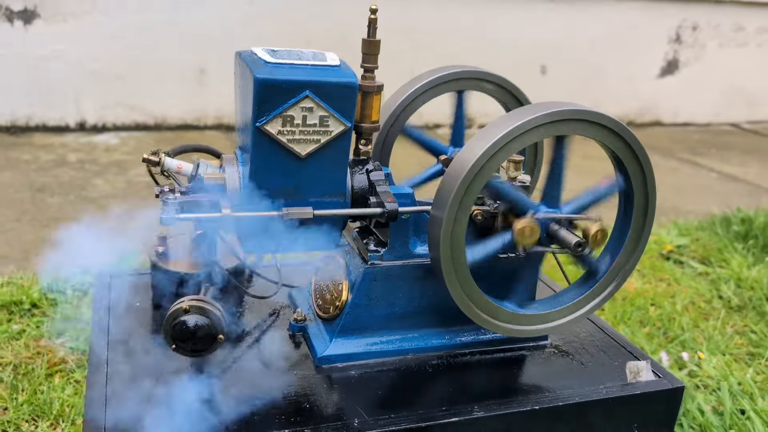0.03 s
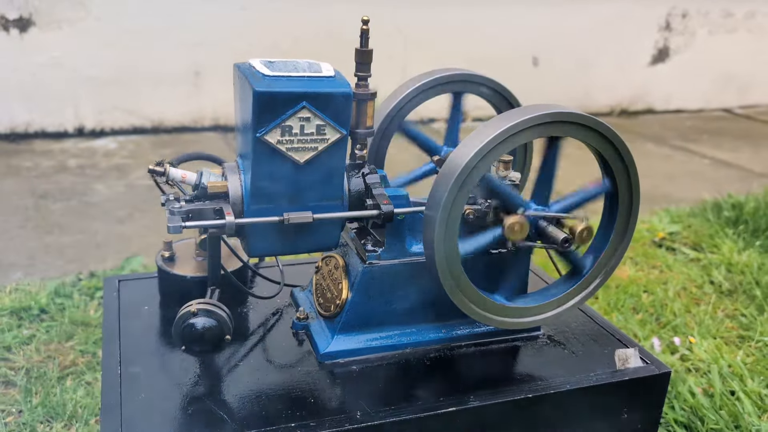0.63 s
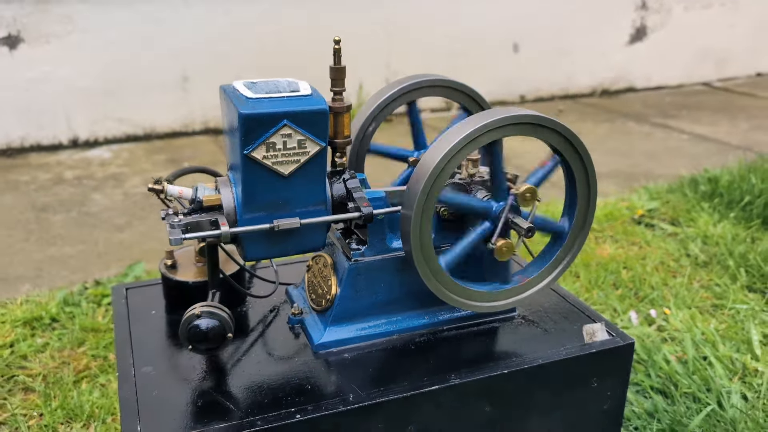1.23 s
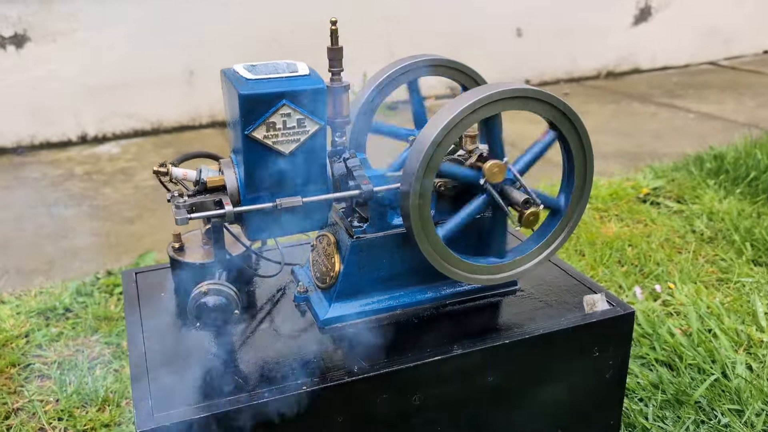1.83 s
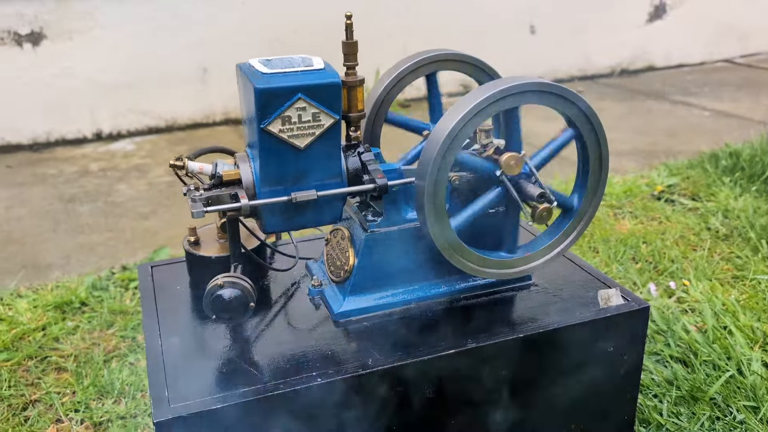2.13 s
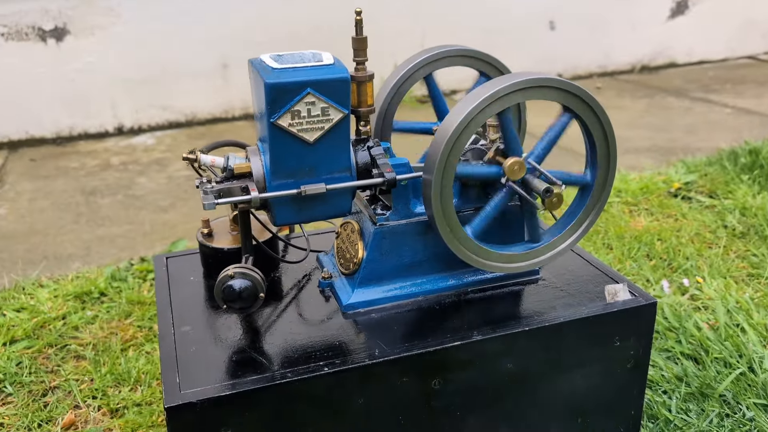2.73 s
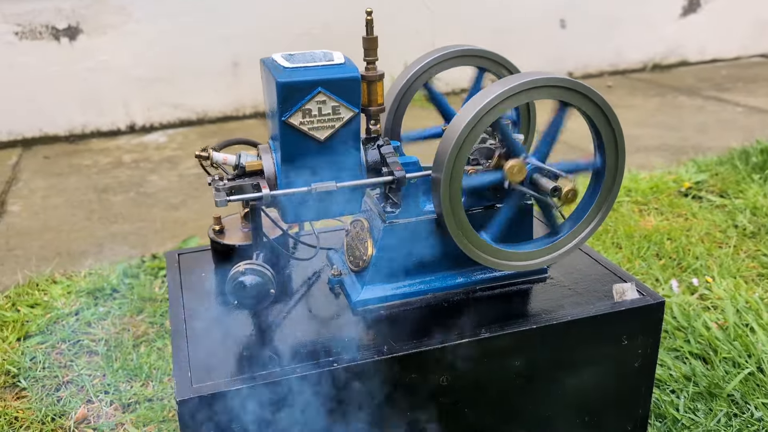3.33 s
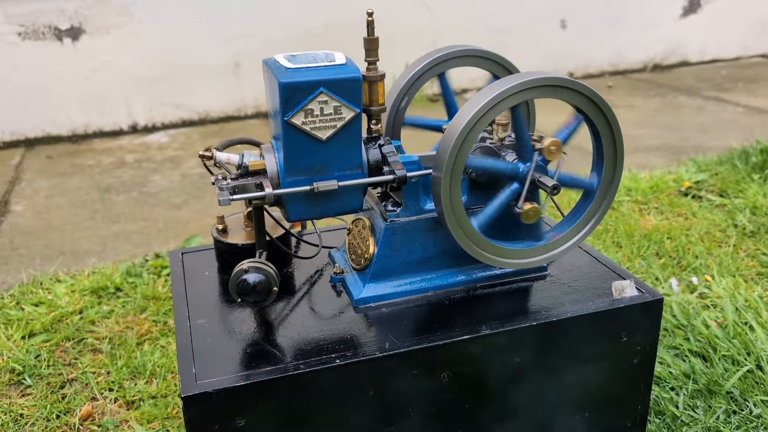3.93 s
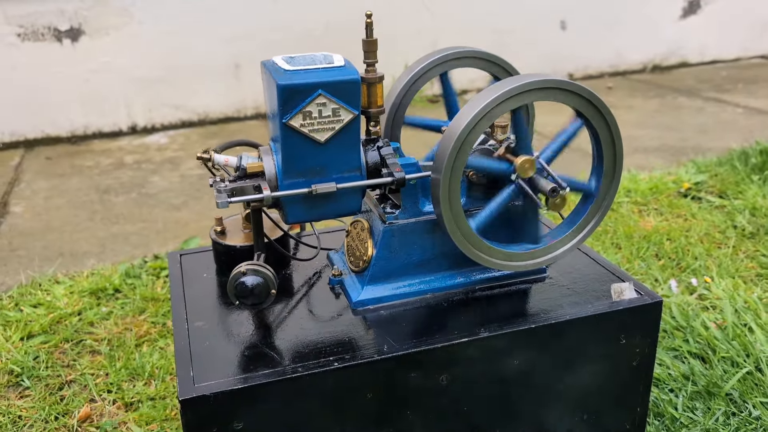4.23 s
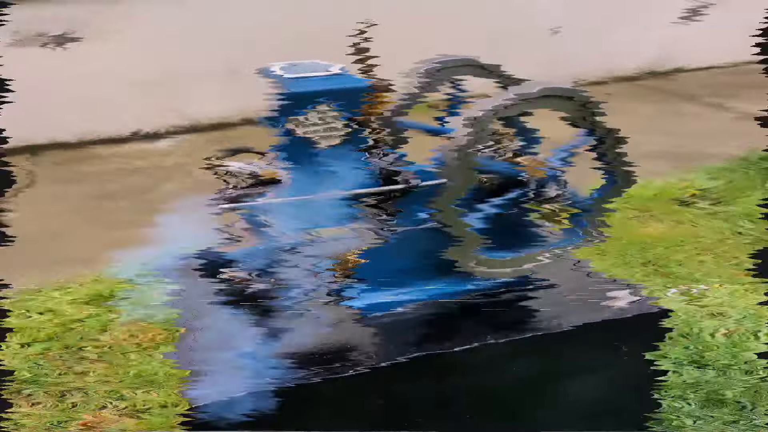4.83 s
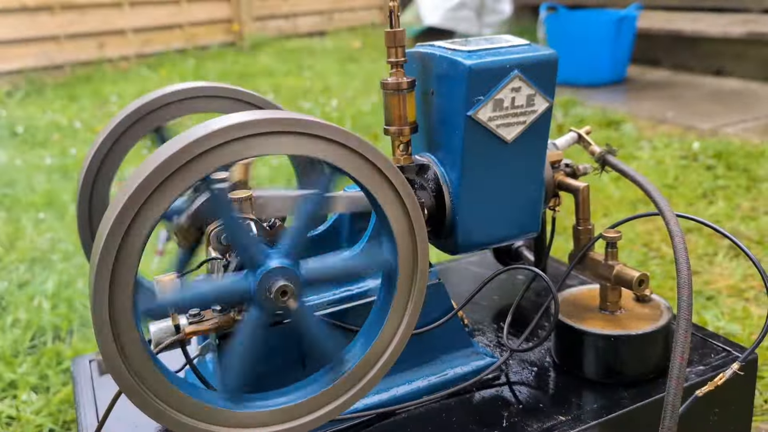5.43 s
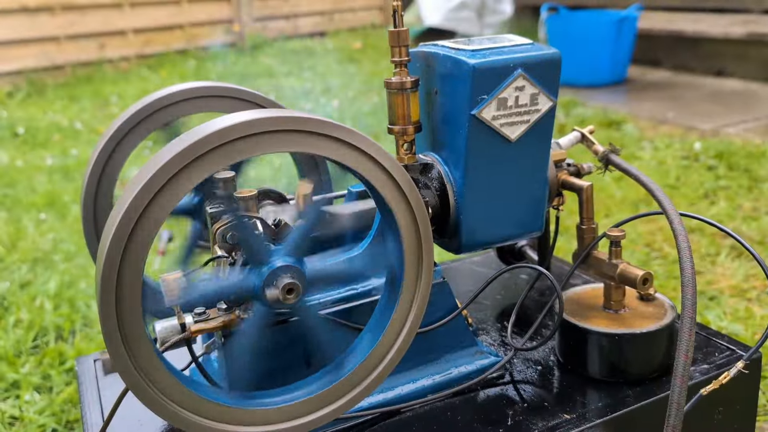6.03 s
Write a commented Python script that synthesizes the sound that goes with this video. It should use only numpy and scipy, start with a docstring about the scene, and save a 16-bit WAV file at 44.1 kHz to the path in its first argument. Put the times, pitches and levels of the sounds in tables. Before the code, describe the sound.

A small stationary gas engine runs on a hollow box in a yard, heard close. It fires with a low thump and a sharp exhaust crack about every second and a half. Between firings the flywheels coast and slow, with rapid knocking, metallic ticking and puffs of air, then a short intake gulp leads to the next bang. Near the end the sound fades out, returns from the engine's other side and fires again.

```python
"""A thump and a sharp crack: a small hit-and-miss gas engine fires on a hollow box in a yard.
Each firing thumps the box and cracks out of the exhaust. Then the flywheels coast and slow down,
while the rod knocks, the linkage ticks and the piston puffs air through the held-open valve.
The engine gulps fresh fuel and fires again. Near the end the sound fades out and comes back,
heard from the other side of the engine."""
import sys
import numpy as np
from scipy import signal
from scipy.fft import rfft, irfft, next_fast_len
from scipy.io import wavfile
from scipy.ndimage import map_coordinates

SR = 44100
rng = np.random.default_rng(int(sys.argv[2]) if len(sys.argv) > 2 else 0)


def dump_mix(stems):
    """Bounce the given channels to the path in sys.argv[1] as a 16-bit WAV at rate SR."""
    frames = np.atleast_2d(stems).T  # one column per channel
    limited = np.clip(frames, -1, 1)  # hard clip at full scale
    pcm = np.round(limited * 32767).astype(np.int16)
    wavfile.write(sys.argv[1], SR, pcm)


N = 273420
TIME = np.arange(N) / SR


def amp(db):
    """Turn decibels into a number to multiply by."""
    return 10 ** (np.asarray(db) / 20)


def unit(x):
    """Scale a signal to an average (rms) size of 1."""
    return x / np.sqrt(np.mean(x ** 2) + 1e-20)


def along(points, hz):
    """Read between the rows of a (frequency, value) table, with octaves evenly spaced."""
    f, v = np.transpose(points)
    return np.interp(np.log(hz + 1), np.log(f), v)


def filtered(x, response):
    """Change each frequency in x by the gain and phase that response gives it."""
    m = next_fast_len(N + SR // 2)
    return irfft(rfft(x, m) * response(np.fft.rfftfreq(m, 1 / SR)), m)[..., :N]


# Sound bouncing off the box and ironwork, compared with direct sound: f/Hz, level/dB
SCATTERED = [(50, -9), (150, -44), (350, -10), (1200, -8), (2500, -3), (5000, 0.5), (15000, 4.5)]
def noise(spectrum):
    """Stereo noise with a given tone: one part shared by both sides, one scattered to each."""
    m = next_fast_len(N)
    hz = np.fft.rfftfreq(m, 1 / SR)
    colour = amp(along(spectrum, hz)) * np.minimum(hz / spectrum[0][0], 1) ** 2
    scattered = amp(along(SCATTERED, hz))
    white = rng.standard_normal((3, 2 * len(hz))).view(complex)
    stereo = (white[0] + scattered * white[1:]) / np.hypot(1, scattered)
    return unit(irfft(stereo * colour, m)[:, :N])


def wobble(rate):
    """A smooth curve through `rate` random points a second."""
    return map_coordinates(rng.standard_normal(int(N * rate / SR) + 4), [TIME * rate / SR])


def swell(t, peak, sharpness):
    """Rise from 0 to 1 at t = peak, then die away."""
    u = np.maximum(t, 0) / peak
    return (u * np.exp(1 - u)) ** sharpness


def add(track, s, sound):
    """Mix a sound into the track, starting at s seconds."""
    part = track[max(round(s * SR), 0):][:len(sound)]
    part += sound[:len(part)]


def repeated(times, levels_db, shape):
    """Place a copy of one shape at each time, each at its own level."""
    track = np.zeros(N)
    for s, db in zip(times, levels_db):
        add(track, s, amp(db) * shape)
    return track


# Tones of burning fuel, exhaust crack, valve hiss and air leaving the pipe: f/Hz, level/dB
BURN_TONE = [(200, 0), (480, -17.5), (720, 4), (930, 5.5), (1200, -4.5), (1700, -6), (3000, -76),
             (7000, -20), (15000, -53)]
CRACK_TONE = [(350, -17), (500, -13.5), (780, -19), (1050, -18.5), (1400, -11.5), (2000, 0.5), (3000, -1.5),
              (4500, -3.5), (7000, -9.5), (9200, -10), (10600, -8), (11700, 1), (13000, -8), (15300, -30)]
VALVE_TONE = [(3000, -1), (5000, -11), (7400, 2), (9500, -5.5), (10500, -6.5), (11100, 0), (11800, 5.5),
              (12400, 5), (13300, 2.5), (15500, 1.5)]
OUT_PUFF_TONE = [(500, -16.5), (1200, 0.5), (1500, -3), (1750, -4), (2300, 0.5), (2650, -1), (2980, 0),
                 (3400, -1.5), (3800, -5), (5200, -11.5), (8500, -33.5)]
# One row per firing: fuel lights t/s, exhaust opens t/s, thump level/dB, crack level/dB,
# crack length t/s, pipe ring level/dB, bark level/dB, burn level/dB
BANGS = [(0.024, .068, -17, -14.5, 0.007, -24.5, -34.5, -27),
         (1.7, 1.746, -20, -13.5, 0.0064, -34.5, -27, -27),
         (3.122, 3.165, -19.5, -14.5, 0.009, -30, -18.5, -28),
         (4.79, 4.835, -19, -13, 0.006, -32, -23, -26.5),
         (5.596, 5.645, -18, -19, 0.013, -16.5, -38, -32.5)]
def firings(leak_lead_s=0.029, leak_db=-25):
    """Burning fuel shoves the frame; the valve cracks open, gas shrieks out and the box heaves."""
    thump, burn, crack, jet, rush, pipe = np.zeros((6, N))
    t = np.arange(SR // 4) / SR
    for lit, opens, thump_db, crack_db, length, ring_db, bark_db, burn_db in BANGS:
        add(burn, lit, amp(burn_db) * (swell(t, 0.003, 0.42) + 0.36 * swell(t, 0.038, 4)))
        add(thump, lit, amp(thump_db) * swell(t, 0.02, 5.9) * np.sin(2 * np.pi * 148 * t))
        add(thump, lit, amp(thump_db - 13.5) * swell(t, 0.025, 3.3) * np.sin(2 * np.pi * 80 * t))
        # A little gas leaks past the valve as it starts to lift.
        add(rush, opens - leak_lead_s, amp(crack_db + leak_db) * swell(t, 0.021, 0.72))
        add(burn, opens, amp(bark_db) * swell(t, .0015, 0.8))  # the first gas out barks
        blast = amp(crack_db) / (1 + (t / length) ** 10)
        add(crack, opens, blast * (1 - np.exp(-t / 0.0011)))
        add(jet, opens, blast * np.minimum(t / .004, 1) ** 2)
        add(pipe, opens, amp(ring_db) * swell(t, 0.0018, 0.75))
        add(rush, opens, amp(crack_db - 13) * swell(t, .02, 1.1))
        add(thump, opens, amp(thump_db) * swell(t, 0.032, 12) * np.sin(2 * np.pi * 62 * t))
        add(thump, opens, amp(thump_db - 5.0) * swell(t, 0.026, 2.7) * np.sin(2 * np.pi * 143 * t))
    sputter = amp(2 * wobble(900))
    exhaust = (crack + rush * sputter) * noise(CRACK_TONE)
    shriek = amp(-1.5) * jet * noise(VALVE_TONE)
    ring = iron_ring(pipe * noise(OUT_PUFF_TONE))
    return thump + burn * noise(BURN_TONE) + exhaust + shriek + ring


# The notes at which the exhaust pipe and valve ring: f/Hz, width f/Hz, level/dB
IRON_NOTES = [(2090, 260, -9), (2430, 223, -1), (2900, 114, 0), (10800, 150, 8.5), (12680, 330, -1.5),
              (14550, 400, -3)]
def iron_ring(x):
    """The pipe and valve boost their own notes in any sound that passes through."""
    return filtered(x, lambda hz: 1 + sum(
        amp(db) * 1j * hz * width / (note ** 2 - hz ** 2 + 1j * hz * width)
        for note, width, db in IRON_NOTES))


CRUISE = 16  # a middling speed, in piston strokes a second
# Runs of coasting: start t/s, starting speed/(strokes/s), speed lost per stroke/(strokes/s),
# speed lost per stroke count squared/(strokes/s)
RUNS = [(0.0079, 23.160, .3220, .004153), (1.6808, 21.937, .2621, .007123), (3.108, 23.416, .3519, .003137),
        (4.7748, 21.8, .35, 0), (4.9931, 15.506, .4382, 0), (5.5867, 23.306, .3952, 0)]
# How much louder each run is: knock and tick level/dB, puff level/dB, hiss level/dB
RUN_LEVELS = [(0.7, 5, 3), (0.85, 0.1, -0.4), (0.5, 0.6, -0.1), (2.5, -7.5, -4), (-4, -2.5, -7.5),
              (-4, -2, -5)]
# Four coasting strokes (in, out, in, out) at CRUISE: level/dB of knock, tick, boom, puff, hiss
STROKE_LEVELS = [(-35, -34.5, -62, -42.5, -42.5), (-33.5, -36.5, -47, -40.5, -40.5),
                 (-35, -35, -53.5, -42.5, -41.5), (-33, -49.5, -45, -40.5, -40.5)]
# What a doubling of speed adds: level/dB for the same five sounds
SPEED_BOOST = [0, 8.5, 25, 15.5, 17]
# What a firing's strokes (suck, squeeze, burn, exhaust) add: level/dB for the same five sounds
FIRING_BOOST = [(-1, 1, 10.5, -2, 6.5), (-4.5, 4.5, -5.5, -20.5, -13), (-7.5, -51.5, 5, -1.5, 0.5),
                (2, -2, 2, -4.5, 6.5)]
def strokes(power_stretch=1.419, late_share=.048, seated_speed=18.4, seated_db=-9):
    """The flywheels slow stroke by stroke. Gives start times, speeds and the five sounds' levels."""
    count, runs = np.arange(32), []
    odd = count % 2
    ends = [run[0] for run in RUNS[1:]] + [N / SR + .1]
    lit = np.array(BANGS)[:, 0]
    for (start, top, loss, drag), (clatter_db, puff_db, hiss_db), end in zip(RUNS, RUN_LEVELS, ends):
        speed = np.maximum(top - loss * count - drag * count ** 2, CRUISE / 2)
        if np.abs(lit - start).min() < 1 / CRUISE:
            speed[0] /= power_stretch  # the flywheels are still gathering speed
        # At the outer end of its travel the rod's slack closes a little late.
        times = start + np.cumsum(1 / speed) - (1 - late_share * odd) / speed
        levels = np.array(STROKE_LEVELS)[count % len(STROKE_LEVELS)]
        levels += np.outer(np.log2(speed / CRUISE), SPEED_BOOST)
        levels += [clatter_db, clatter_db, 0, puff_db, hiss_db]
        # At high speed the rod stays seated at that end and knocks less.
        levels[:, 0] += seated_db * odd / (1 + np.exp((seated_speed - speed) / 0.12))
        runs.append(np.column_stack([times, speed, levels])[times < end - .5 / speed])
    rows = np.vstack(runs)
    for fired in lit:
        power_stroke = np.abs(rows[:, 0] - fired).argmin()
        for stroke, change_db in enumerate(FIRING_BOOST, power_stroke - 2):
            if stroke >= 0:
                rows[stroke, 2:] += change_db
    return rows.T


def crank():
    """For every moment: which stroke it is, how much of it is done, and strokes a second."""
    times, speed = strokes()[:2]
    progress = np.interp(TIME, times, np.arange(len(times)))
    stroke = progress.astype(int)
    return stroke, progress % 1, speed[stroke]


# Tones of the rattling gears and the rumbling base: f/Hz, level/dB
GEAR_TONE = [(200, 2.5), (280, 2), (350, -2), (480, 6), (800, -3.5), (1300, -1.5), (2000, -10), (3200, -20),
             (5500, -20), (9000, -20), (11700, -39), (15000, -59)]
RUMBLE_TONE = [(25, -37), (40, -10.5), (57, 7), (76, 4), (105, -3), (160, 0), (240, -7.5), (340, -16),
               (600, -48)]
def gears_and_base():
    """The gears rattle and the base rumbles, both louder when the engine turns faster."""
    pace = crank()[2] / CRUISE
    rattle = amp(3 * wobble(130))
    gears = amp(-51.5) * rattle * pace ** 2.74 * noise(GEAR_TONE)
    return gears + amp(-45.0) * pace ** 0.51 * noise(RUMBLE_TONE)


# Tone of the rod's knock: f/Hz, level/dB
KNOCK_TONE = [(130, -0.5), (260, 1), (480, 0.5), (620, -2.5), (850, -0.5), (1300, 2), (1700, -8),
              (2600, -13), (5000, -36)]
def rod_knocks(travel_s=.008, front_hz=1900, chirp_delay_s=0.00146, spread_db=1.2):
    """The rod's slack closes at each turn: a dry clack, then bending waves make a falling chirp."""
    times, _, knock_db = strokes()[:3]
    t = np.arange(SR // 20) / SR
    rattle_shape = swell(t, 0.00092, 0.94) + 0.46 * swell(t, 0.007, 0.95)
    rattle = repeated(times, knock_db, rattle_shape) * noise(KNOCK_TONE)
    blows = repeated(times, knock_db + rng.normal(21.0, spread_db, len(times)), np.ones(1))
    bass_cut = lambda hz: np.minimum(hz / KNOCK_TONE[1][0], 1) ** 2
    thuds = filtered(blows, lambda hz: unit(amp(along(KNOCK_TONE, hz)) * bass_cut(hz)))
    clack_db = knock_db + rng.normal(-2, spread_db, len(times))
    clacks = repeated(times, clack_db, swell(t, 0.0021, 0.45)) * noise(KNOCK_TONE[2:])
    # High notes travel faster in bending waves, so they arrive first.
    lag = lambda hz: travel_s * (2 * np.sqrt(1000 / (hz + 1)) - np.sqrt(1000 / front_hz))
    chirps = filtered(thuds + rattle, lambda hz: np.exp(-2j * np.pi * hz * (lag(hz) + chirp_delay_s)))
    return clacks + chirps


# Tone of the linkage's tick: f/Hz, level/dB
TICK_TONE = [(900, 4), (2000, -0.5), (3800, 7.5), (5200, 2.5), (8000, 1), (12000, 0.5), (15500, -2)]
def linkage_ticks():
    """The levers tick at each turn, midway through every other stroke, and tripping spark and valve."""
    times, _, _, tick_db = strokes()[:4]
    lit, opens = np.array(BANGS)[:, :2].T
    t = np.arange(SR // 40) / SR
    tick = swell(t, 0.00055, 1.0) + 0.23 * swell(t, 0.0057, 1)
    midway = (times[:-1] + .46 * np.diff(times))[::2]
    trips = np.concatenate([lit - .0135, opens - .0185])
    main = repeated(times, tick_db + rng.normal(4.5, 1.0, len(times)), tick)
    light = repeated(midway, tick_db[::2][:len(midway)] + rng.normal(1.5, 2.4, len(midway)), tick)
    snaps = repeated(trips, rng.normal(-35, 1, len(trips)), tick)
    return (main + light + snaps) * noise(TICK_TONE)


# The notes of the air in the box and of its lid: f/Hz, level/dB
BOX_NOTES = [(152, 6.5), (238, -7.5)]
def box_boom():
    """Every stroke rocks the hollow box, which booms at a slightly different pitch each time."""
    track, t = np.zeros(N), np.arange(SR // 6) / SR
    times, _, _, _, boom_db, _, _ = strokes()
    for hz, note_db in BOX_NOTES:
        for s, db, (detune, phase) in zip(times, boom_db, rng.standard_normal((len(times), 2))):
            tone = np.sin(2 * np.pi * (hz * (1 + 0.047 * detune) * t + phase))
            add(track, s, amp(db + note_db) * swell(t, 0.01, 0.41) * tone)
    return track


# Tone of air sucked back into the pipe: f/Hz, level/dB
IN_PUFF_TONE = [(500, -2), (1250, 15.5), (1700, 6.5), (2150, 14), (2900, 11), (3700, -2.5), (5200, 8),
                (8500, -50)]
def piston_puffs():
    """Air goes out and in through the open exhaust, fastest near mid-stroke, and rings the iron."""
    stroke, done, _ = crank()
    puff_db, hiss_db = strokes()[-2:, stroke]
    flow = lambda skew: np.abs(np.sin(np.pi * done ** skew))
    pipe = np.where(stroke % 2, amp(1.63) * noise(OUT_PUFF_TONE), amp(-1.67) * noise(IN_PUFF_TONE))
    puff = amp(puff_db) * flow(1.45) ** 1.78 * pipe
    hiss = amp(hiss_db - 1.6) * flow(1.21) ** 1.7 * noise(VALVE_TONE)
    flutter = amp(2.26 * wobble(250))
    return iron_ring((puff + hiss) * flutter)


# Tone of the thin hiss: f/Hz, level/dB
SIZZLE_TONE = [(4000, -14), (6000, -10.5), (12000, -6), (15500, -5)]
def sizzle(loudest_s=1.27, width_s=0.58):
    """A thin hiss swells and fades while the engine first coasts."""
    return amp(-47.5) * np.exp(-((TIME - loudest_s) / width_s) ** 2) * noise(SIZZLE_TONE)


# Gulps of fuel and air: strongest flow t/s, half length t/s, level/dB
GULPS = [(1.543, 0.025, -34.5), (2.986, 0.023, -33), (4.636, 0.023, -34), (5.445, 0.019, -33)]
# Tones of the rush through the fuel mixer and the gulp in its throat: f/Hz, level/dB
MIXER_TONE = [(300, -16.5), (550, 6.5), (900, -36), (1300, -2.5), (1800, -2), (3000, -27), (4800, -4.5),
              (6500, -5.5), (9000, -8), (11700, -2), (13000, -17), (15300, -8.5)]
THROAT_TONE = [(260, 5.5), (400, -3), (560, 3), (750, -3), (1200, -8.5), (1800, -41), (3000, -57)]
def fuel_gulps():
    """With the exhaust shut, the piston sucks fuel and air past the fluttering inlet valve."""
    flow = sum(amp(db) / (1 + ((TIME - s) / half) ** 6) for s, half, db in GULPS)
    flutter = amp(3.5 * wobble(220) - 2.5)
    return flow * flutter * (amp(-1.5) * noise(MIXER_TONE) + amp(-2.0) * noise(THROAT_TONE))


# How long the yard's echo takes to fall by 60 dB: f/Hz, t/s
ECHO_TIMES = [(100, 0.11), (500, 0.72), (2500, 0.17), (8000, 0.096), (15000, 0.054)]
def yard_echo(x, gap_s=.007):
    """Wall and paving send back a soft wash of sound, different on each side and weak in the bass."""
    hz, t, spectrum = signal.stft(rng.standard_normal((2, SR // 3)), SR, nperseg=256)
    decay = amp(-60 * t / along(ECHO_TIMES, hz)[:, None])
    tail = signal.istft(spectrum * decay, SR, nperseg=256)[1]
    delayed = np.pad(x, (int(gap_s * SR), 0))
    echo = signal.fftconvolve(delayed[None], tail / np.linalg.norm(tail[0]), axes=1)[:, :N]
    return filtered(echo, lambda hz: amp(along(SCATTERED, hz)))


def heard_from(x, left_lead_s, balance):
    """The direct sound reaches one ear sooner, and each ear with its own tone."""
    side = np.array([[.5], [-.5]])
    lead = lambda hz: np.exp(2j * np.pi * hz * left_lead_s * side)
    return filtered(x, lambda hz: amp(side * along(balance, hz)) * lead(hz))


SWITCH_S = 4.957  # when the listener changes sides
# How much louder left is than right, in front of the engine and behind it: f/Hz, level/dB
FRONT_LEFT_BOOST = [(60, 3), (200, -4.5), (700, 4), (1290, -5.5), (2380, 2), (4400, 1), (15000, -3)]
BACK_LEFT_BOOST = [(60, 6.5), (200, 0), (700, 2), (1290, -9.5), (2380, 2.5), (8120, -4.5), (15000, -8)]
# How the tone changes on the engine's far side: f/Hz, level/dB
BACK_TONE = [(70, -5.5), (170, -2.5), (270, -5), (400, 2.5), (550, 0.5), (800, -1), (1300, -4.5),
             (1850, -0.5), (2370, -6.5), (2950, 0), (3600, -3), (5500, -2.5), (9500, 0), (11200, 5),
             (12800, -3), (14600, 7.5), (15500, -3)]
def scene():
    """The whole engine in its yard, heard first from the front and then from behind."""
    engine = (firings() + gears_and_base() + rod_knocks() + linkage_ticks() + box_boom()
              + piston_puffs() + sizzle() + fuel_gulps())
    front = heard_from(engine, left_lead_s=0.00017, balance=FRONT_LEFT_BOOST)
    far_side = filtered(engine, lambda hz: amp(along(BACK_TONE, hz)))
    back = heard_from(far_side, left_lead_s=-0.000033, balance=BACK_LEFT_BOOST)
    return np.where(TIME < SWITCH_S, front, back) + amp(-9.5) * yard_echo(engine[0])


def record(dry, low_cut_hz=38, top_hz=15850, fade_out_s=.55, fade_in_s=.6):
    """Trim the deepest bass, round off peaks, fade around the change of sides and cut the top treble."""
    trimmed = filtered(dry, lambda hz: 1 - 1 / (1 + (hz / low_cut_hz) ** 6))
    rounded = trimmed / (1 + trimmed ** 6) ** (1 / 6)
    fade = np.minimum(np.maximum((SWITCH_S - TIME) / fade_out_s, (TIME - SWITCH_S) / fade_in_s), 1)
    return filtered(rounded * fade, lambda hz: hz < top_hz)


dry = scene()
out = record(dry)
dump_mix(out)
```